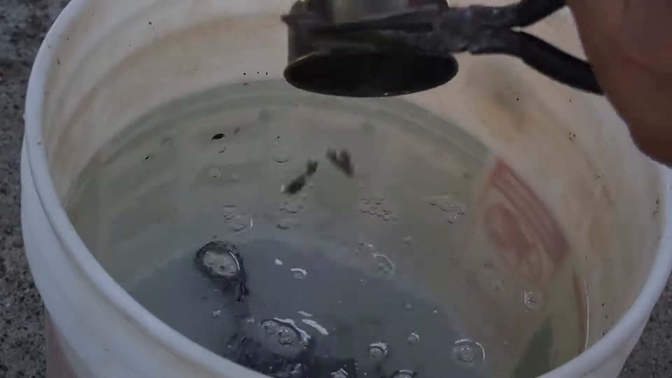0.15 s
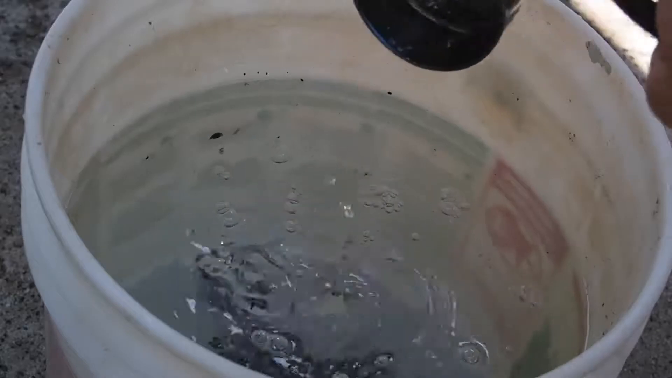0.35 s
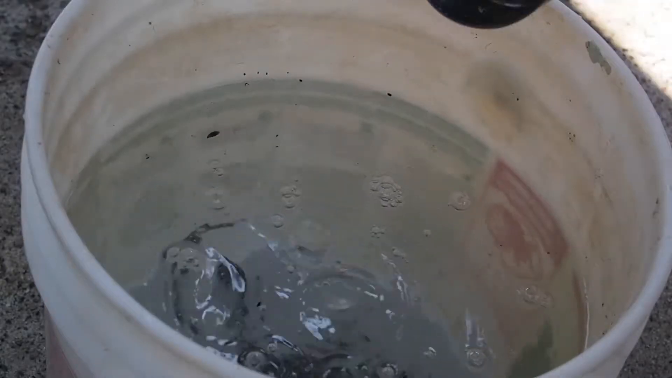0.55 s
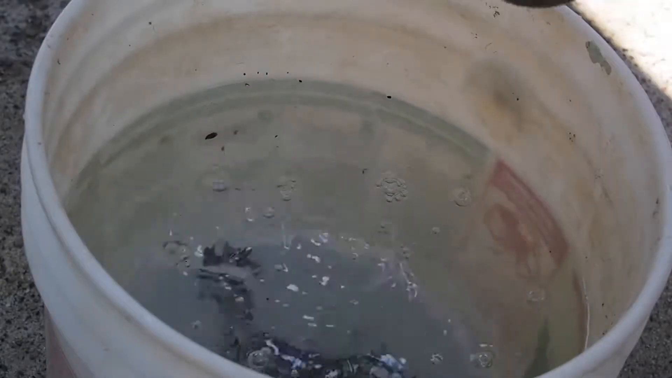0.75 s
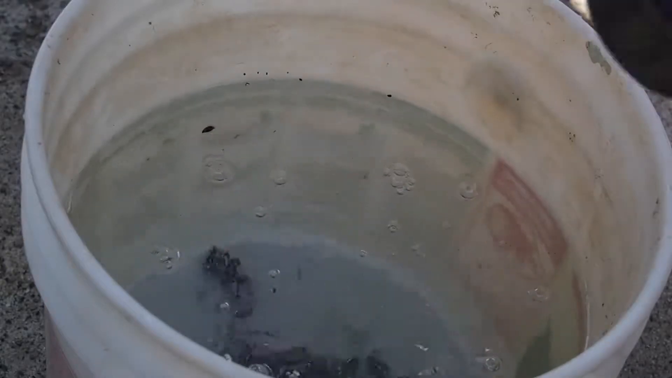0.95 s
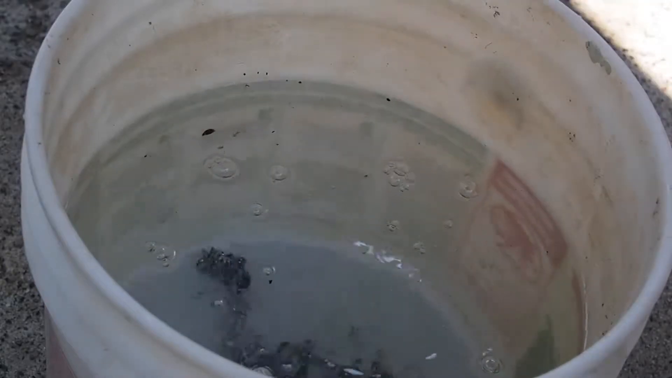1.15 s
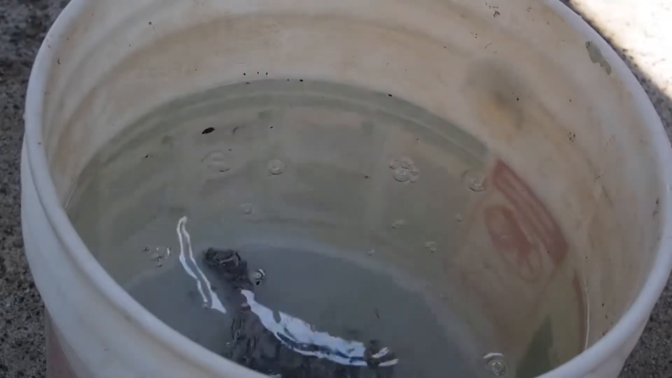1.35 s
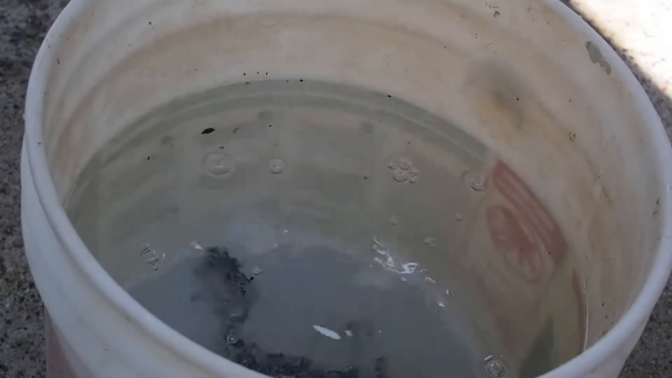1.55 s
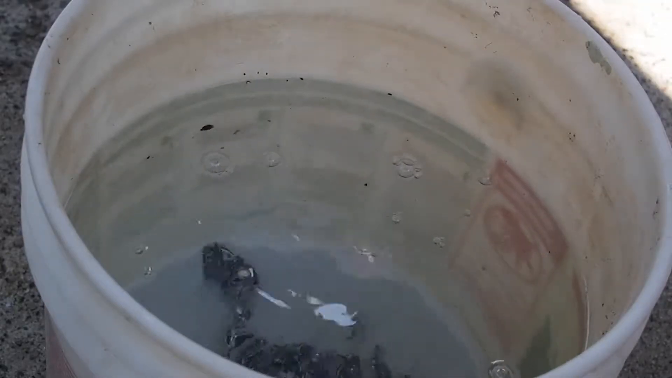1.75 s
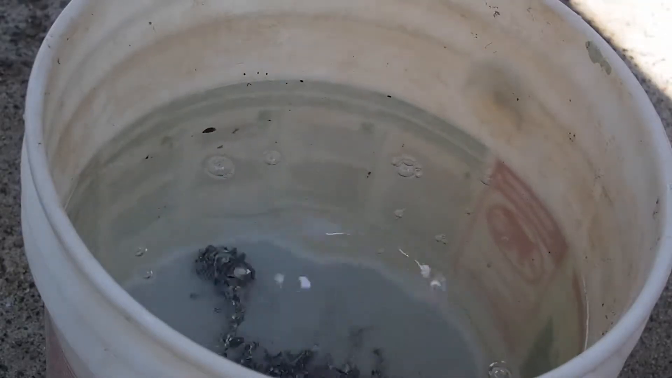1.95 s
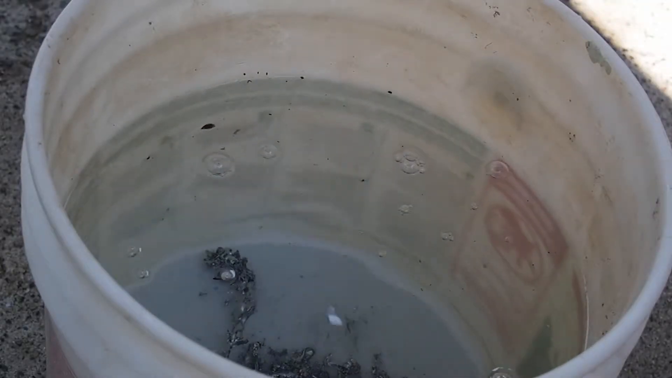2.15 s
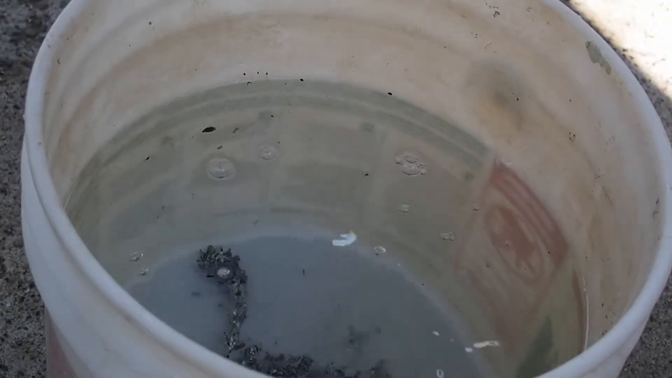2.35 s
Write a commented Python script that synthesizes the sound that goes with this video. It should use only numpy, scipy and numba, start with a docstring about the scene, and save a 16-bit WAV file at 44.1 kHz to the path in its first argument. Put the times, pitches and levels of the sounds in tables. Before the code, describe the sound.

Hot metal quenched in water with two short hisses, then squeak, grit scuff and rattling metal cup

```python
"""Outdoors by a bucket of water, distant machinery hums under the air the whole time.
Two blobs of molten metal are quenched with short spits of steam (noise in a resonance that moves), and bubbles ring.
Tiny ticks follow at the surface, then metal squeaks (a few wavering sines) and a shoe scuffs on grit (dense clicks).
A metal cup is set down on concrete, bounces and rattles (clicks ring its modes); a last scuff follows.
The recorder turns itself down on loud peaks."""
import sys
import numpy as np
from scipy import signal
from scipy.fft import rfft, irfft
from scipy.io import wavfile
from numba import njit

SR = 44100
rng = np.random.default_rng(int(sys.argv[2]) if len(sys.argv) > 2 else 0)


def unload_wav(signal):
    """Save mono or channel-first audio to the path in sys.argv[1] as 16-bit WAV at rate SR, clipped to [-1, 1]."""
    wavfile.write(
        sys.argv[1],
        SR,
        np.round(np.clip(np.atleast_2d(signal).T, -1, 1) * 32767).astype(np.int16),
    )


def ratio_of_db(decibels):
    """Turn decibels (scalar or array-like) into linear amplitude factors; 0 dB maps to 1."""
    return 10 ** (np.asarray(decibels, float) / 20)


N = 108045
T = np.arange(N) / SR   # time of each sample [s]
F = np.maximum(np.arange(N // 2 + 1) * SR / N, 1)   # frequency grid [Hz]


def rms_one(x):
    """Scale to rms 1."""
    return x / np.sqrt(np.mean(x ** 2) + 1e-20)


def in_time(rows):
    """Draw each table column as a curve over time, with a gate that is open between first and last row."""
    s, *columns = np.transpose(rows)
    gate = np.clip(np.minimum(T - s[0], s[-1] - T) * 250, 0, 1)   # 4 ms fades
    return [gate] + [np.interp(T, s, column) for column in columns]


def at_hz(points):
    """Read a spectrum table on the frequency grid, along log frequency."""
    hz, value = np.transpose(points)
    return np.interp(np.log(F), np.log(hz), value)


def colour(x, points):
    """Filter by a dB spectrum."""
    return irfft(rfft(x) * ratio_of_db(at_hz(points)), N)


def drift(rate_hz):
    """Chance wandering: noise that fades above rate_hz, rms 1."""
    return rms_one(irfft(rfft(rng.standard_normal(N)) / (1 + (F / rate_hz) ** 2), N))


def click_at(s):
    """One unit click at time s."""
    return 1. * (np.arange(N) == int(s * SR))


def ring(x, hz, t60):
    """A struck mode: each unit click starts a sine of height 1 that falls 60 dB in t60 seconds."""
    r = ratio_of_db(-60 / (max(t60, 1e-3) * SR))
    w = 2 * np.pi * hz / SR
    return signal.lfilter([0, np.sin(w)], [1, -2 * r * np.cos(w), r * r], x + 1e-18)


def grains(rate_per_s, spread_db):
    """Many small contacts: random clicks of either sign and uneven size, rms 1."""
    size = ratio_of_db(spread_db * np.minimum(rng.exponential(1, N), 4))
    sign = rng.choice([-1, 1], N)
    present = rng.random(N) < rate_per_s / SR
    return rms_one(size * sign * present)


def burst(s, db, hz, decay_s, q):
    """A puff of noise around hz that starts at s and dies quickly."""
    edges = np.clip([hz / (1 + 1 / q), hz * (1 + 1 / q)], 50, .45 * SR)
    band = signal.butter(1, edges, "band", fs=SR, output="sos")
    noise = rms_one(signal.sosfilt(band, rng.standard_normal(N)))
    fade = (T >= s) * np.exp(-np.maximum(T - s, 0) / decay_s)
    return ratio_of_db(db) * noise * fade / 2


def tilted(x, tilt_db):
    """Treble raised or lowered as time goes."""
    treble = signal.sosfilt(signal.butter(2, 8500, "high", fs=SR, output="sos"), x)
    return x + (ratio_of_db(tilt_db) - 1) * treble


def air():
    """Distant machinery and breeze: noise alike on both sides in the bass, wavering hum and a motor note."""
    # colour of the air: pitch_hz [Hz], relative level_db [dB]
    air_spectrum = [(42, -44), (72, -14), (139, -5.5), (160, -10), (230, -1.5), (370, -17.5), (509, -9),
                    (1350, -11), (1620, -11), (1860, -15.5), (14400, -36), (16500, -24.5)]
    # how alike left and right are: pitch_hz [Hz], likeness [0 to 1]
    likeness = [(60, 0.82), (240, 0.97), (950, 0.96), (3770, 0.43), (15000, 0.037)]
    # machine hums, each a narrow band of noise: pitch_hz [Hz], level_db [dB rms], width_hz [Hz]
    hums = [(116, -54, 59), (168, -50, 5.7), (233.3, -54.5, 8.3)]
    air_db, patchy_db = -40.5, 1.18
    motor_hz, motor_db, motor_waver_db = 58.5, -51, 2

    mid, side = rfft(rng.standard_normal((2, N)))
    alike = np.clip(at_hz(likeness), 0, 1)
    shared = np.sqrt(1 + alike) * mid
    opposed = np.sqrt(1 - alike) * side * [[1], [-1]]
    noise = rms_one(irfft((shared + opposed) * ratio_of_db(at_hz(air_spectrum)), N))
    out = ratio_of_db(air_db + patchy_db * drift(35)) * noise
    for hz, db, width in hums:
        bell = 1 / (1 + (2 * (F - hz) / width) ** 2)
        out = out + ratio_of_db(db) * rms_one(irfft(rfft(rng.standard_normal(N)) * bell, N))
    phase = 2 * np.pi * motor_hz * T + 0.52 * drift(1.7)
    motor = np.sqrt(2) * np.sin(phase)
    return out + ratio_of_db(motor_db + motor_waver_db * drift(4.5)) * motor


def squeak():
    """Rubbing metal sings: five partials on one wavering pitch, strongest on the second."""
    # course of the squeak: time_s [s], pitch_hz of the second partial [Hz], level_db [dB]
    course = [(1.19, 5520, -44), (1.205, 5190, -44), (1.235, 5210, -37.5), (1.255, 5140, -43),
              (1.278, 5240, -44), (1.305, 5400, -41), (1.33, 5550, -39.5), (1.395, 5460, -40),
              (1.42, 5620, -50), (1.485, 5500, -64)]
    # relative level of each partial, lowest first: level_db [dB]
    partials_db = [-16, -.1, -17, -22, -28]
    gate, hz, db = in_time(course)
    phase = np.pi * np.cumsum(hz * (1 + .008 * drift(140))) / SR   # half of hz: the lowest partial
    out = np.zeros(N)
    for k, partial_db in enumerate(partials_db):
        level = ratio_of_db(db + partial_db + 3.0 * drift(90))
        out += level * np.sqrt(2) * np.sin((k + 1) * phase)
    return gate * out


def scuffs():
    """A shoe drags over grit: dense grains under each stroke, and one pebble snaps in damped modes."""
    # one list per stroke: time_s [s], level_db [dB], treble tilt_db [dB]
    strokes = [
        [(1.465, -52, -3), (1.48, -40.5, -1), (1.505, -38.5, -3), (1.555, -40.5, 0), (1.59, -60, -3)],
        [(1.61, -42, 4), (1.617, -30, -6), (1.63, -30, -18), (1.655, -30.5, -5), (1.695, -43.5, 8.5),
         (1.75, -51, -2)],
        [(2.37, -46.5, 5), (2.405, -35, 8.5), (2.45, -67, -4)],
    ]
    # colour of the grit: pitch_hz [Hz], relative level_db [dB per Hz]
    grit_spectrum = [(410, -39), (800, -3), (2050, 0), (2900, 2.5), (3900, -1), (5470, -5), (16000, -24.5)]
    # the pebble: level_db of each mode [dB], list of mode pitch_hz [Hz], t60_s [s]
    snap_db, snap_hz, snap_t60 = (-18, [1150, 1900, 2950], .014)
    grit = rms_one(colour(grains(rate_per_s=7100, spread_db=-2.5), grit_spectrum))
    snap = np.zeros(N)
    for k, hz in enumerate(snap_hz):
        snap += (-1) ** k * ring(click_at(1.6203), hz, snap_t60)
    out = ratio_of_db(snap_db) * snap
    for rows in strokes:
        gate, db, tilt_db = in_time(rows)
        out += gate * ratio_of_db(db) * tilted(grit, tilt_db)
    return out


@njit
def cavity(x, hz, q, sr):
    """A resonance whose centre moves, as when a hollow changes size."""
    y = np.zeros(len(x))
    for i in range(2, len(x)):
        r = np.exp(-np.pi * hz[i] / q / sr)
        drive = np.sqrt(1 - r * r) * (x[i] - x[i - 2]) / 2
        y[i] = drive + 2 * r * np.cos(2 * np.pi * hz[i] / sr) * y[i - 1] - r * r * y[i - 2]
    return y


def quench():
    """Hot metal boils water: rough steam noise, part of it singing in a cavity; bubbles ring on."""
    # one list per spit: time_s [s], level_db [dB], cavity pitch_hz [Hz],
    # singing against plain hiss share_db [dB], treble tilt_db of the hiss [dB]
    spits = [
        [(.207, -48, 3700, -8, 2), (.213, -24, 3480, -11, 10.5), (.226, -17.5, 3350, 0, -10),
         (.25, -18, 3250, -1, -9), (.267, -17, 2980, 10, 1), (.274, -31, 2800, -2, -5), (.32, -50, 2770, -7, 1)],
        [(.362, -52, 9000, -4, 11), (.369, -24, 8300, 2, 11.5), (.378, -23.5, 5540, 14, -13),
         (.386, -32.5, 4000, -17, -4), (.391, -28, 4130, -13, -1), (.397, -42.5, 4100, -2, 5),
         (.43, -46, 4130, -2, -6)],
    ]
    # colour of the hiss: pitch_hz [Hz], relative level_db [dB per Hz]
    steam_spectrum = [(300, -22), (500, -3.5), (1400, -12), (2500, -9), (3300, 1.5), (6300, -0.5),
                      (8500, -10.5), (12500, -4), (16000, -6.5)]
    # bubbles left ringing: start_s [s], level_db before wavering [dB], pitch_hz [Hz], t60_s [s]
    bubbles = [(.256, -26, 2865, .17), (.385, -35, 4060, .12), (.389, -28, 1590, .025),
               (.22, -31, 1530, .16), (.268, -30, 650, .12), (.484, -35, 1450, .04)]
    # tiny bursts at the surface: start_s [s], relative level_db [dB], pitch_hz [Hz]
    ticks = [(.924, -41.5, 12500), (1.201, -37.5, 6340)]
    cavity_q, overtone, overtone_db, rough_db = 11.0, 1.9, -3, 1.3

    out = np.zeros(N)
    for rows in spits:
        gate, db, hz, share_db, tilt_db = in_time(rows)
        white = rng.standard_normal((2, N)) * ratio_of_db(rough_db * drift(360))
        hiss = tilted(rms_one(colour(white[0], steam_spectrum)), tilt_db)
        sung = cavity(white[1], hz, cavity_q, SR)
        upper_hz = np.minimum(overtone * hz, 16000.)
        sung = sung + ratio_of_db(overtone_db) * cavity(white[1], upper_hz, cavity_q, SR)
        mix = (hiss + ratio_of_db(share_db) * sung) / np.sqrt(1 + ratio_of_db(2 * share_db))
        out += gate * ratio_of_db(db) * mix
    for s, db, hz, t60 in bubbles:
        out += ratio_of_db(db + 2.5 * drift(70)) * ring(click_at(s), hz, t60)
    for s, db, hz in ticks:
        out += burst(s, db, hz, decay_s=0.0027, q=16.0)
    return out


def cup():
    """A cup meets concrete: blows and rattle drive the same modes, and some blows also crack."""
    # blows: start_s [s], relative level_db [dB], brightness [dB per octave],
    # relative crack_db [dB], so low on some blows that no crack is heard
    blows = [(1.8464, -23.5, -1, -4), (1.894, -16, 0.5, -37), (1.9407, -13, -3.5, -6.5),
             (2.122, -24, 1, -38), (2.1344, -25.5, 2, -16), (2.153, -30.5, -5, -22)]
    # rattling and rocking on the rim: time_s [s], relative level_db [dB],
    # brightness [dB per octave], bare scratch_db against that level [dB]
    rattle = [(1.85, -33.5, 21, 3), (1.865, -10.5, 6, -10), (1.937, -23.5, -11.5, -1),
              (1.96, -20.5, -14, -9.5), (1.99, -16.5, -6, -18), (2.105, -37, -8, -12), (2.13, -33, -9, -14),
              (2.138, -18.5, 1, -1), (2.18, -26, 1, -7.5), (2.23, -36.5, 4, -2), (2.28, -33, -2.5, -11),
              (2.4, -40, -9.5, -10.5), (2.45, -36, 6, -13)]
    # modes of the cup: pitch_hz [Hz]
    modes_hz = [1136, 1199, 1248, 1311, 1362, 1497, 1735, 1995, 2320, 3032, 3109, 4065, 4190, 4970, 5950,
                6896, 10110, 11365]
    # relative level of each mode: level_db [dB]
    modes_db = [-10, -14, -3, -5, -2, -13, -14, -8, -13, 0, -8, -3, -8, -15, -18, -8, -23, -19]
    # colour of the bare scratch: pitch_hz [Hz], relative level_db [dB per Hz]
    scratch_spectrum = [(700, 3), (1900, 13), (2500, 12), (3050, 17), (3600, 12), (4150, 18), (4800, 9),
                        (15000, 1.5)]
    # the handle ticks against the rim, bright and brief: start_s [s], relative level_db [dB]
    taps = [(2.012, -18.5), (2.112, -17.5), (2.218, -22.5)]
    ring_t60_s, rattle_drive_db, blow_spread_db = 0.11, -31, 2.5

    gate, db, bright, scratch_db = in_time(rattle)
    touches = grains(rate_per_s=4000, spread_db=4.0) * gate
    scratch = rms_one(colour(touches, scratch_spectrum)) * np.sqrt(np.mean(gate ** 2))
    s, blow_db, blow_bright, crack_db = np.transpose(blows)
    spread = rng.normal(0, blow_spread_db, (len(blows), len(modes_hz)))
    # on the first blow the base lands flat: one damped note
    slap = ratio_of_db(-1) * ring(click_at(s[0]), hz=1308, t60=0.08)
    out = scratch * ratio_of_db(db + scratch_db) + slap
    for k, (hz, mode_db) in enumerate(zip(modes_hz, modes_db)):
        octave = np.log2(hz / 3000)
        # each touch drives each mode by a different chance amount
        push = touches * ratio_of_db(db + rattle_drive_db + bright * octave) * rng.uniform(-0.58, 1, N)
        push[(s * SR).astype(int)] += ratio_of_db(blow_db + blow_bright * octave + spread[:, k])
        out += (-1) ** k * ratio_of_db(mode_db) * ring(push, hz, ring_t60_s)
    out = signal.sosfilt(signal.butter(2, 1110, "high", fs=SR, output="sos"), out)
    for start, level_db in zip(s, crack_db):
        out += burst(start, level_db, hz=2230, decay_s=0.0022, q=2.7)
    for start, level_db in taps:
        out += burst(start, level_db, hz=9000, decay_s=0.0019, q=1.3)
    return out


def place(x, lag_us):
    """Sound reaches the left side a little later than the right."""
    late = irfft(rfft(x) * np.exp(-2j * np.pi * F * lag_us * 1e-6), N)
    return np.array([late, x])


def echoes(x, t60, hz, kind, db):
    """A dying noise tail of echoes, different on each side."""
    t = np.arange(SR // 2) / SR
    tail = rng.standard_normal((2, len(t))) * ratio_of_db(-60 * t / t60) * (t > .0005)
    tail = signal.sosfilt(signal.butter(1, min(hz, .45 * SR), kind, fs=SR, output="sos"), tail)
    tail = tail / np.sqrt(np.sum(tail ** 2) / 2)
    return ratio_of_db(db) * signal.fftconvolve(x[None], tail, axes=1)[:, :N]


def yard(x):
    """Bright near echoes from bucket and ground, duller ones from the walls."""
    near = echoes(x, t60=0.013, hz=9200, kind="high", db=-2.5)
    walls = echoes(x, t60=0.23, hz=16000, kind="low", db=-13.5)
    return near + walls


def scene():
    """All sources in the yard."""
    # delay of the left side for each place: lag_us [microseconds]
    left_lag_us = {"water": 7, "cup": 59.8}
    water = quench()
    ground = cup() + scuffs() + squeak()
    direct = place(water, left_lag_us["water"]) + place(ground, left_lag_us["cup"])
    return direct + yard(water + ground) + air()


def roll_off(x):
    """The treble ends steeply here."""
    return signal.sosfilt(signal.butter(12, 16640, fs=SR, output="sos"), x)


def record(dry):
    """The right microphone is hotter; gain control ducks after peaks, which are rounded; the top is cut."""
    # left minus right: pitch_hz [Hz], level_db [dB]
    left_minus_right = [(60, -2), (380, -2.5), (2380, -2), (15000, -6)]
    knee_db, slope, release_db_per_s, attack_s = -7, 0.76, 36, 0.00033
    ceiling, cutoff_hz = 1.1, 16270

    lean = at_hz(left_minus_right) / 2
    x = irfft(rfft(dry) * ratio_of_db([lean, -lean]), N)
    peak_db = 20 * np.log10(np.abs(x).max(0) + 1e-9)
    over = np.maximum(peak_db - knee_db, 0) * slope
    ramp = release_db_per_s * T
    held = np.maximum.accumulate(over + ramp) - ramp   # jumps up at once, falls back steadily
    r = np.exp(-1 / (attack_s * SR))
    x = x * ratio_of_db(-signal.lfilter([1 - r], [1, -r], held))
    rounded = ceiling * np.tanh(x / ceiling)
    mix = signal.sosfilt(signal.cheby2(12, 60, cutoff_hz, fs=SR, output="sos"), rounded)
    return roll_off(mix)


dry = scene()
out = record(dry)
unload_wav(out)
```